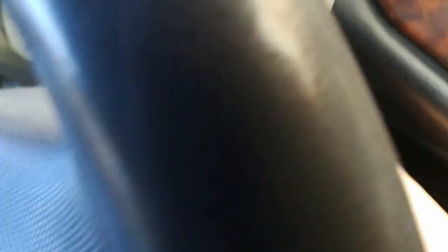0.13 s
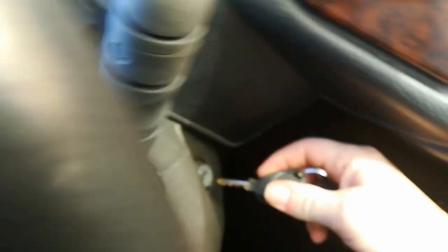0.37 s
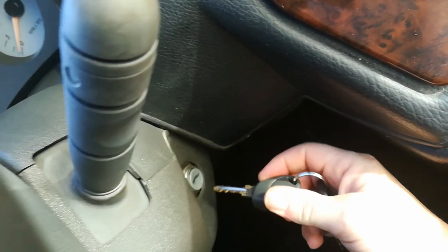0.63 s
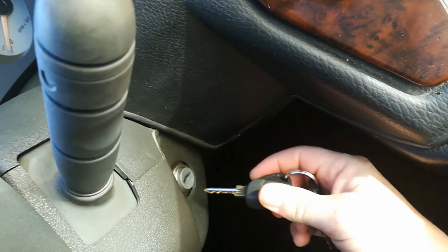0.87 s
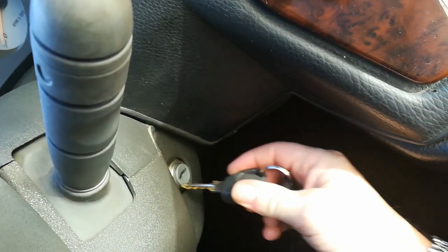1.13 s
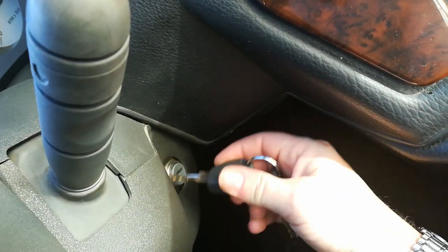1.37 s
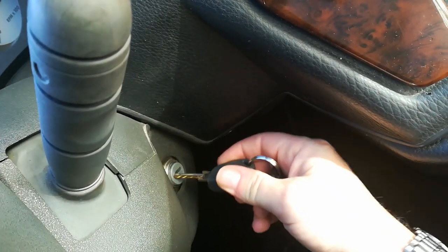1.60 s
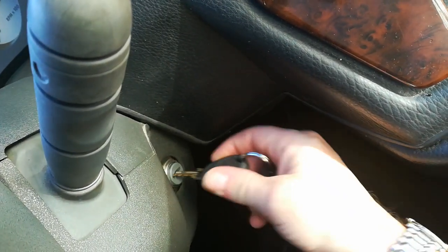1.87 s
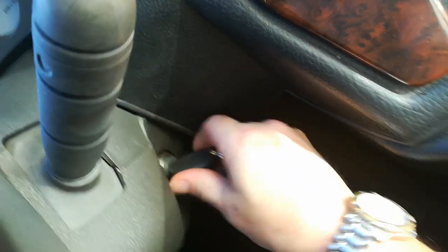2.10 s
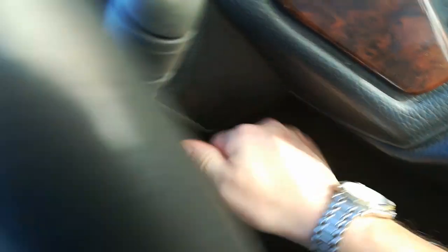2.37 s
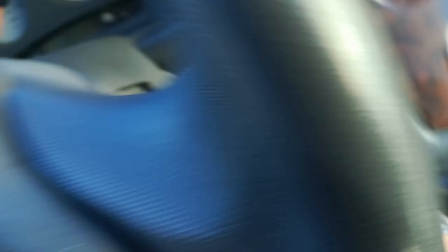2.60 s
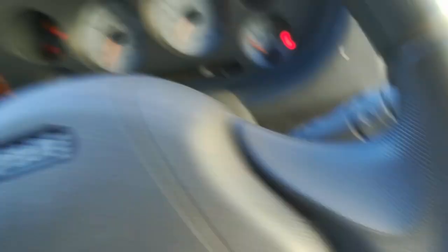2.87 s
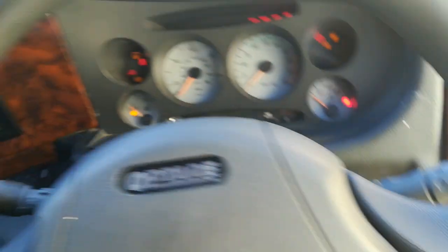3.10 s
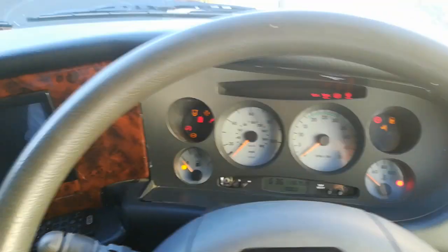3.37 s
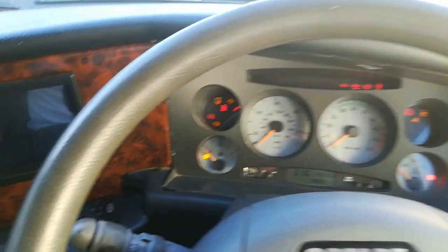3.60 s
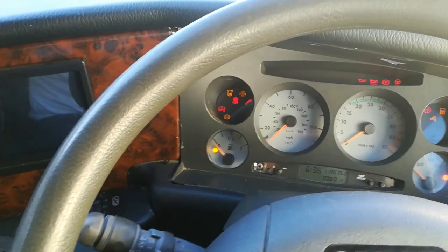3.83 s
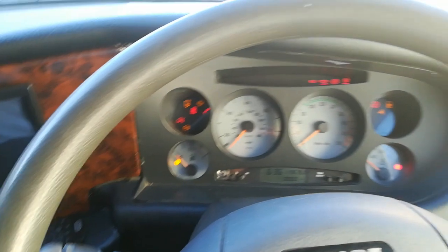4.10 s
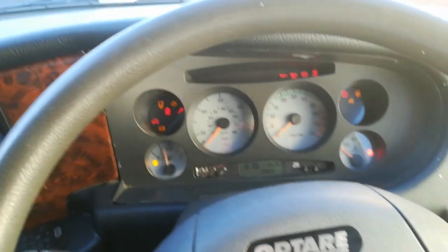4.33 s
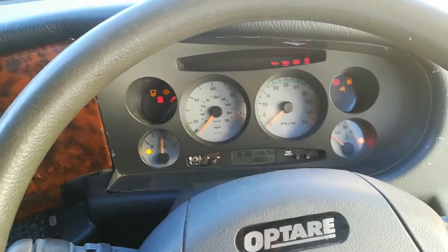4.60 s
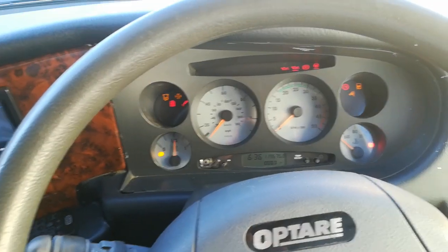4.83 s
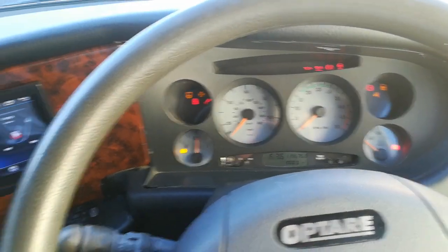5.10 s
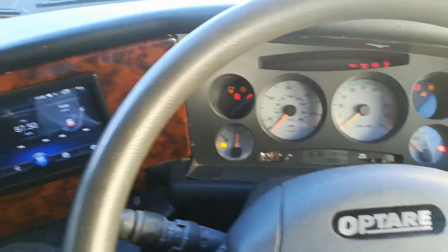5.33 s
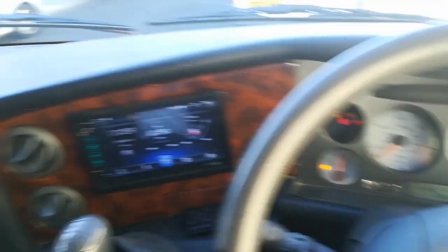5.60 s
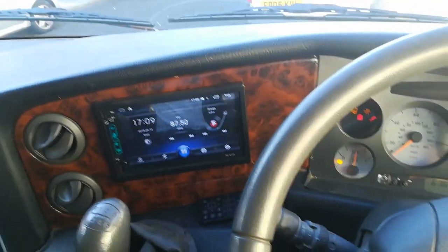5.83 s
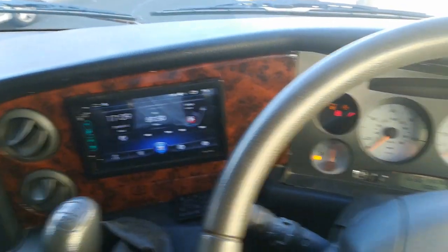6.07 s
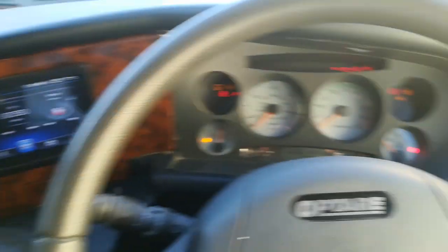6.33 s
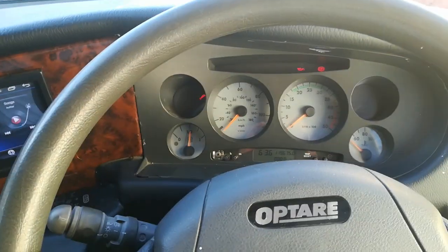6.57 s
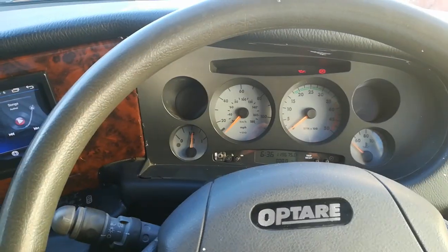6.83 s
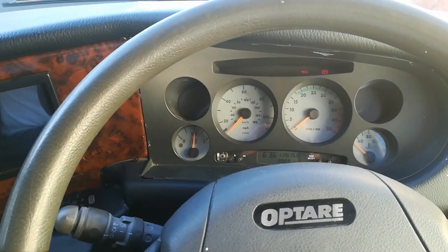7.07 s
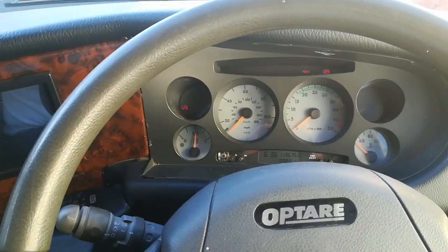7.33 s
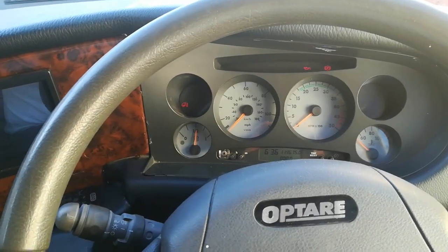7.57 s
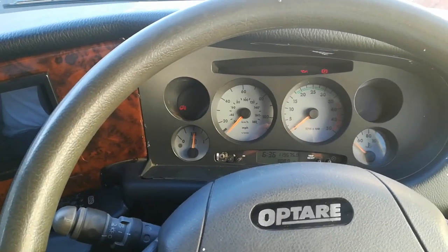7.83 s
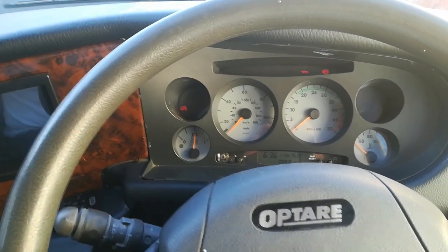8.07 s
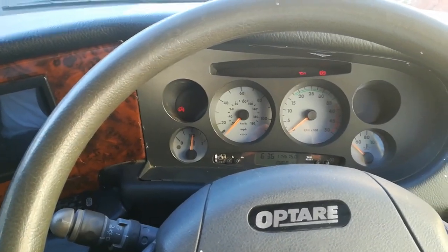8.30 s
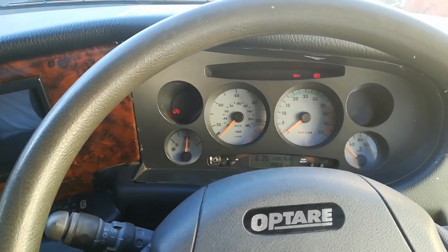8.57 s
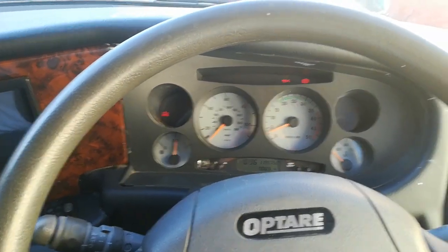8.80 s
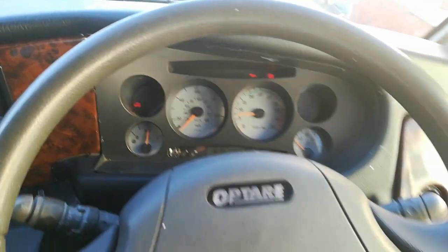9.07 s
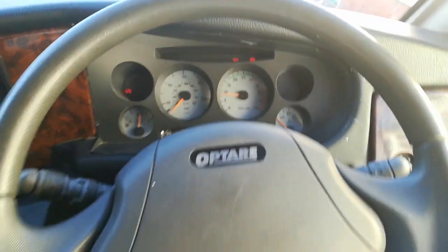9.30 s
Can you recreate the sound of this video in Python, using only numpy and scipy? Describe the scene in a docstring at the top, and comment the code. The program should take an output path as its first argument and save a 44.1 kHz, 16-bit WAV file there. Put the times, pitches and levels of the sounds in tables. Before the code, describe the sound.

Inside a small vehicle cab, key rattling and handling thumps give way to sharp relay clicks, laboured cranking, rough first firings and a steady diesel idle.

```python
"""A diesel engine is started, heard inside its small, short-ringing cab: summed crank orders make the exhaust and
double blows of noise the knock, from the first uneven firings to a four-cylinder idle. Before it the starter
clashes and whines as each compression frees it. A key taps the lock, slides in, turns and springs back and relays
click: noise rattles that excite damped modes. A sleeve brushes the wheel as stick-slip grains; soft knocks and a
creak are low damped modes. A hand-held phone adds grip rumble and hiss; the dashboard hums faintly."""
import sys
import numpy as np
from scipy import signal
from scipy.fft import rfft, irfft, next_fast_len
from scipy.io import wavfile
from scipy.ndimage import uniform_filter1d, map_coordinates

SR = 44100
rng = np.random.default_rng(int(sys.argv[2]) if len(sys.argv) > 2 else 0)


def ratio(d):
    """dB to gain"""
    e = np.asarray(d, float) / 20
    return 10 ** e


def wav_out(sig):
    """Save sig, one row per channel (or a flat mono array), as 16-bit PCM at SR to the path in sys.argv[1]."""
    wavfile.write(sys.argv[1], SR, np.round(np.clip(np.atleast_2d(sig).T, -1, 1) * 32767).astype(np.int16))


N = 415863
T = np.arange(N) / SR
SIZE = next_fast_len(N + SR // 2)
HZ = np.arange(SIZE // 2 + 1) * SR / SIZE

# Levels in all tables are relative: they hold at the source, ahead of later gains and the cab.

# microphone hiss spectrum: pitch_hz, density_db (per Hz)
HISS_SPECTRUM = [(59, -36), (100, -4.5), (302, -12), (365, -10), (705, -16.5), (1080, -13.5),
                 (16000, -23.5)]
HISS_DB = -73
# dashboard electrics: pitch_hz, level_db (rms)
ELECTRIC_HUM = [(360.7, -87), (726.7, -94)]
# stereo width of the cab's echo: pitch_hz, side_minus_mid_db
ECHO_WIDTH = [(60, -33), (125, -16), (250, -1.5), (500, 7)]
# balance of the two ports: pitch_hz, left_minus_right_db
PORT_BALANCE = [(200, 0.0), (1290, 2.0), (3000, 5.5), (8120, 3.5), (15000, -3.5)]

# the phone shifting in the hand: peak_s, level_db, rise_s, fall_s
HAND_SHIFTS = [(.3, -60, 0.31, 0.18), (2.1, -50, 0.24, 0.14), (3.001, -49, 0.46, 0.22),
               (4.05, -49.5, 0.086, 0.29), (4.45, -60, 0.33, .12), (5.65, -48, 0.11, 0.088)]
GRIP_DB = -66.5  # rumble of a still hand

# knocks through seat, wheel and chassis: start_s, level_db, pitch_hz, t60_s
BODY_KNOCKS = [(1.8, -49.5, 227, 0.2), (1.954, -30, 137, 0.13), (2.188, -30, 128, 0.27),
               (2.441, -29.5, 245, 0.066), (2.51, -26.5, 155, 0.018), (2.687, -30, 81, 0.019),
               (2.76, -37.5, 466, 0.1), (3.021, -41.5, 117, 0.58), (3.958, -45, 239, 0.25),
               (4.176, -26, 103, 0.11), (4.861, -39.5, 190, 0.13), (5.501, -46, 248, 0.23),
               (6.885, -25, 160, 0.21), (7.144, -23, 103, 0.092)]
# the wheel rim creaks: start_s, level_db, pitch_hz, t60_s, pitch_loss (share)
RIM_CREAK = (2.328, -33, 360, .1, .48)

# resonances of the rubbed surface: pitch_hz, width_hz, level_db
RUB_RESONANCES = [(7120, 500, 3), (1010, 210, 6), (1440, 310, -1), (2560, 250, 3), (3433, 1400, 2)]
# treble bands of rubbing that swell on their own: from_hz, to_hz, level_db
RUB_TREBLE = [(2500, 1500, -4.5), (3436, 5900, -4.5), (6300, 5200, 2), (9020, 11000, -12.5)]
RUB_DRIFT_MS = 2  # delay per unit of the smoothed wander
# one long drag of the sleeve along the wheel: time_s, level_db, brightness_db, bass_db
SLEEVE_DRAG = [(2.325, -53.5, 3, 12), (2.39, -50, -5, 4.5), (2.46, -45, 1, -0.5), (2.53, -43.5, -4.5, -6.5),
               (2.68, -56.5, 6.5, 0.5), (2.76, -50.5, -1, 1), (3.04, -50.5, -3, -4.5), (3.21, -52, -4, -3),
               (3.26, -67.5, -3.5, -3), (3.38, -76, -2.5, 8)]
# short brushes of key and cloth: start_s, rise_s, level_db, brightness_db, ring_hz, ring_db
SHORT_BRUSHES = [(0.01, 0.022, -52, -17.5, 6300, 0.5), (1.17, 0.061, -58.5, -16, 1870, -2),
                 (1.25, 0.035, -49.5, -8.5, 1920, -2.5), (1.771, 0.04, -56.5, -26.5, 1300, 4),
                 (1.871, 0.14, -46, -5.5, 1860, -1), (2.031, .11, -70, 8.5, 3030, -4),
                 (2.35, 0.11, -61.5, -19, 8300, 18), (2.48, 0.14, -67, -10, 2500, 15.5),
                 (2.85, 0.17, -67, -12, 7040, 10), (3.27, 0.019, -62.5, -14, 2500, -5.5),
                 (3.498, 0.066, -59, -14, 1594, 1), (3.947, 0.038, -50, -9.5, 5240, -11.5),
                 (4.151, 0.08, -56.5, -9.5, 9260, -8.5), (4.318, 0.0091, -75, 8, 3730, 9),
                 (4.44, 0.01, -73, 12.5, 3280, 3), (5.489, 0.024, -60, -2, 5506, -3)]
BRUSH_START_DB, BRUSH_FADE_DB_PER_S, BRUSH_RING_Q = -7.5, 412, 8

# dry ticks of loose trim close to the phone: start_s, level_db, brightness_db (per octave), rattle_ms
TRIM_TICKS = [(7.996, -26.5, -1, 0.82), (8.076, -23.5, 1.5, 1.8), (8.19, -30.5, 1.5, 2),
              (9.162, -34.5, -1.5, 0.74), (9.227, -20, 2, 0.69)]
# mode of the trim: pitch_hz, level_db, t60_s
TRIM_MODES = [(9434, 8, 0.0048)]
# relays under the dash: start_s, level_db, brightness_db (per octave), rattle_ms, hardest_struck_hz
RELAY_CLICKS = [(3.517, -39, -5, 1, 1659), (3.549, -44, -6, 2.05, 1659), (4.849, -7.5, -2, 2.2, 1659),
                (7.237, -22, -2, 1.35, 5800)]
# modes of a relay: pitch_hz, level_db, t60_s
RELAY_MODES = [(445, 0, 0.045), (1190, 4.5, 0.036), (1659, 8, 0.028), (3670, 1, 0.05), (5800, 5, 0.02)]
# the key tapping, entering and ratcheting over the pins:
# start_s, level_db, brightness_db (per octave), rattle_ms, hardest_struck_hz
LOCK_TAPS = [(0.087, -20.5, -5, 1.0, 1910), (1.126, -26.5, -3, 1.45, 1220),
             (1.158, -16.5, -1.5, 0.65, 1910), (1.284, -31.5, -5, 3, 1180), (1.539, -21.5, 0, 1.1, 3670),
             (1.597, -35, -12.5, 1.24, 1910), (1.808, -40, -12.5, 3.7, 1370),
             (1.903, -23, -0.5, 1.05, 1223), (1.924, -11.5, -0.5, 0.55, 1910),
             (1.937, -13.5, -3, 1.05, 1370), (1.95, -13.5, 2.5, 1.6, 1387), (1.963, -19, -0.5, 1.3, 4610),
             (1.986, -17.5, -1, 1.6, 1910), (2.0, -24.5, -3.5, 0.8, 4610), (2.007, -18.5, 0.5, 1.7, 1910),
             (2.178, -27, -3.5, 2.8, 1910), (2.194, -15, 0, 4, 4610), (2.269, -29.5, -3.5, 1.9, 5900),
             (2.281, -13.5, 1.5, 3.1, 4610), (2.414, -29.5, 0, 1.1, 3670), (2.757, -33, -2, 2.9, 1194),
             (3.155, -37.5, -2, 0.47, 5900)]
# modes of key and lock: pitch_hz, level_db, t60_s
LOCK_MODES = [(1194, 6, 0.024), (1382, 7, 0.024), (1910, 6, 0.018), (2635, 0, 0.018), (3670, -3.5, 0.022),
              (4610, -1, 0.03), (5900, -6, 0.029), (8000, -5, 0.025)]
# the ignition switch snapping through its detents: start_s, level_db, brightness_db (per octave), rattle_ms
SWITCH_SNAPS = [(6.734, -36.5, -5, 2.47), (6.758, -29.5, -0.5, 0.86), (6.781, -13.5, 1.5, 2),
                (8.259, -6, -1, 2.4), (8.297, -25.5, -6.5, 2.8)]
# modes of the ignition switch: pitch_hz, level_db, t60_s
SWITCH_MODES = [(900, 2, 0.025), (1657, 6, 0.025), (1860, 5, 0.025), (4600, -2, 0.015), (5170, 1, .015),
                (7290, 5, .012)]
# broad crack of a click: pitch_hz, level_db
CLICK_CRACK = [(150, -33.5), (650, -24.5), (900, 1), (2000, -0.5), (4000, 2.5), (10000, -1), (16000, -13)]
TRAVEL_S, TRAVEL_DB = 0.0065, -4  # a sprung part scrapes briefly before it snaps
MODE_SCATTER_DB, STRUCK_MODE_DB = 1, 9

# each piston going over compression frees the starter: start_s, gear_db, whine_db, free_run_s
FREE_RUNS = [(6.85, -38.5, -55, 0.04), (6.942, -48.5, -48.5, 0.086), (7.089, -44, -46, 0.17),
             (7.376, -41, -35.5, 0.07), (7.553, -40, -37, 0.074), (7.737, -38.5, -36.5, 0.073),
             (7.863, -37.5, -34, 0.38)]
# gear noise spectrum: pitch_hz, density_db (per Hz)
GEAR_SPECTRUM = [(500, -14.5), (839, -1.5), (1550, -7.5), (2070, -10), (7470, -13.5), (8300, -18.5),
                 (10800, -34.5)]
# the starter housing rings: pitch_hz, width_hz, level_db
HOUSING_RESONANCES = [(1870, 40, 11), (3150, 45, 7), (7200, 1100, 4)]
FREE_HZ, LOADED_HZ = 332, 199.8  # starter whine running free and pushing a piston up
COLD_S, FIRES_S, RELEASE_S = 7.05, 7.85, 8.2  # compression drags the starter down from COLD_S to FIRES_S
UNLOADED_DB = -11.5  # the whine is softer once the engine pulls itself round
POWERED_DB = -54  # steady gear noise under the free runs, as long as the motor is powered
COAST_DB, COAST_FADE_S = -50.5, 0.32
# the engine rocking on its mounts: a jolt at engagement, steady cranking, a swell as the cylinders catch
ENGAGE_S, JOLT_DB, JOLT_FADE_S, ROCK_DB = 6.875, -24.5, 0.019, -40.5
SWELL_FULL_S, SWELL_DB, SWELL_RISE_S = 8.03, -24.5, 0.06

# first uneven firings: start_s, knock_db, boom_db
FIRST_FIRINGS = [(7.862, -19.5, -36), (7.904, -28.5, -36), (7.936, -30.5, -43), (7.965, -20.5, -43),
                 (8.011, -19, -17), (8.045, -18, -22), (8.075, -16.5, -12), (8.117, -24.5, -14),
                 (8.226, -17.5, -21)]
# running engine: time_s, firing_rate_hz, exhaust_db, knock_db
IDLE_COURSE = [(8.16, 32, -34, -46), (8.27, 29.5, -27, -44), (8.34, 30, -21, -44), (8.46, 31.8, -25.5, -45),
               (9.1, 31.6, -27, -47), (9.43, 31.6, -28, -46)]
# exhaust orders: crank_multiple (times crank speed), level_db
CRANK_ORDERS = [(1, -20), (2, 0), (4, -2), (6, -14), (9, -14), (10, -12), (14, -18)]
# knock spectrum of the block: pitch_hz, density_db (per Hz)
BLOCK_SPECTRUM = [(140, -36), (230, -2), (360, -2), (645, -18.5), (1030, -17), (1810, -21.5), (2400, -21),
                  (3600, -23), (14000, -39)]
# panel resonances: pitch_hz, width_hz, level_db
PANEL_RESONANCES = [(1030, 70, 1), (1860, 240, 8.5), (2460, 110, 0)]
# knock strength of each cylinder in firing order: level_db
CYLINDER_KNOCK_DB = [-1, -1.5, -0.5, 2.5]
HALF_ORDER_DB = -20  # lines between the orders, from cycle-long unevenness
DIP_S = 8.71  # one moment of lowest exhaust pressure
KNOCK_S, SECOND_KNOCK_S, SECOND_KNOCK_DB = 0.0049, 0.013, -8  # each firing is two blows on the block
WHIRR_DB = -60  # steady hiss of belts and fan


def on_log(points):
    """Spectral interpolation: a (Hz, value) table read at every bin along a logarithmic axis."""
    hz, value = np.transpose(points)
    return np.interp(np.log(HZ + 1), np.log(hz), value)


def shape(x, gain):
    """Linear filtering: the spectrum is multiplied by a gain per bin."""
    return irfft(rfft(x, SIZE) * gain, SIZE)[..., :N]


def band(lo_hz, hi_hz):
    """Band-pass response: steep skirts outside two corner frequencies."""
    return 1 / np.sqrt((1 + (lo_hz / (HZ + 1)) ** 8) * (1 + (HZ / hi_hz) ** 8))


def peaks(table, base_db):
    """Resonance curves: Lorentzian powers of (Hz, width Hz, dB) standing on a flat base."""
    power = sum(ratio(db) ** 2 / (1 + (2 * (HZ - f) / w) ** 2) for f, w, db in table)
    return np.sqrt(ratio(base_db) ** 2 + power)


def unit(x):
    """Normalisation: scale to rms 1."""
    return x / np.sqrt(np.mean(x ** 2))


def noise(gain):
    """Coloured noise: white noise through a spectral gain, at rms 1."""
    return unit(shape(rng.standard_normal(N), gain))


def grains(spread_db):
    """Impulsive noise: samples of long-tailed size make a fine crackle."""
    return rng.standard_normal(N) * ratio(spread_db * np.minimum(rng.exponential(size=N), 6))


def walk(rate_hz):
    """Slow modulation: smoothed random steps of rms 1."""
    k = int(SR / rate_hz)
    return unit(uniform_filter1d(np.repeat(rng.standard_normal(N // k + 1), k), k)[:N])


def curves(table, fade_s=0.0062):
    """Parameter curves: columns per sample, and a gate open only while the table lasts."""
    s, *columns = np.transpose(table)
    gate = np.interp(T, [s[0] - fade_s, s[0], s[-1], s[-1] + fade_s], [0, 1, 1, 0])
    return [gate] + [np.interp(T, s, c) for c in columns]


def add(track, s, sound):
    """Superposition: mix a short sound in at s."""
    i = int(s * SR)
    track[i:i + len(sound)] += sound[:N - i]


def ring(hz, t60, rise_s, sag=0., sag_s=None):
    """Damped mode: a decaying sine after a soft push, peak 1; its pitch may sag as the contact loosens."""
    t = T[:SR // 2]
    turn = 2 * np.pi * hz * np.cumsum(1 - sag * np.tanh(t / (sag_s or t60))) / SR
    y = np.sin(turn) * 1000. ** (-t / max(t60, .005)) * (1 - np.exp(-t / rise_s))
    return y / np.abs(y).max()


def cab(x, t60=.14, direct_db=-4, gain_db=0):
    """Small-room acoustics: bass arrives nearly alike at both ports, treble by two unlike dense echo tails."""
    t = T[:SR // 4]
    tail = rng.standard_normal((2, len(t))) * 1000. ** (-t / t60)
    tail /= np.sqrt(np.sum(tail ** 2, axis=1, keepdims=True))
    tail[:, 0] += ratio(direct_db) * np.array([1, 0])  # direct sound, in the mid only
    mid, side = rfft(tail, SIZE) / np.sqrt(1 + ratio(direct_db) ** 2)
    high = 1 / (1 + (480 / (HZ + 1)) ** 4)
    mid = 1 - high + high * mid
    side = side * ratio(on_log(ECHO_WIDTH))
    lean = ratio(on_log(PORT_BALANCE) / 2)
    ports = np.array([(mid + side) * lean, (mid - side) / lean])
    return shape(x, ports * ratio(gain_db) / np.sqrt((lean ** 2 + lean ** -2) / 2))


def stillness():
    """Incoherent noise and pure tones: microphone hiss, unlike in each port, and faint electric hum."""
    hiss = np.array([noise(ratio(on_log(HISS_SPECTRUM))) for _ in range(2)]) * ratio(HISS_DB + 3)
    return hiss + sum(np.sqrt(2) * ratio(db) * np.sin(2 * np.pi * f * T) for f, db in ELECTRIC_HUM)


def hand():
    """Contact rumble: low noise from the grip on the phone, swelling at each shift."""
    level = ratio(GRIP_DB)
    for s, db, rise_s, fall_s in HAND_SHIFTS:
        level = level + ratio(db) * np.exp(-((T - s) / np.where(T < s, rise_s, fall_s)) ** 2)
    waver = ratio(2.5 * walk(5))
    return level * waver * noise(band(8.2, 67) + ratio(-18.5) * band(97, 210))


def thumps():
    """Modal excitation: soft blows ring a low mode and leave a rumble in the body shell; the rim creaks."""
    modes, shell = np.zeros((2, N))
    t = T[:SR]
    for s, db, hz, t60 in BODY_KNOCKS:
        add(modes, s, ratio(db) * ring(hz, t60, 0.0041, sag=0.11))
        add(shell, s, ratio(db - 13.5) * 1000. ** (-t / (3 * t60)) * np.tanh(t / 0.0028))
    s, db, hz, t60, sag = RIM_CREAK
    add(modes, s, ratio(db) * ring(hz, t60, 0.022, sag=sag, sag_s=0.029))
    rumble = noise(band(25, 380) * (60 / (HZ + 30)) ** 0.21)
    return shape(modes, band(10, 900)) + shell * rumble


def steady(x):
    """Level equalisation: divide by the running rms."""
    return x / np.sqrt(uniform_filter1d(x ** 2, SR // 8) + 1e-12)


def wander(x):
    """Doppler-like drift: a varying delay moves the resonance as the contact moves."""
    delay = RUB_DRIFT_MS * SR / 1000 * uniform_filter1d(walk(6), SR // 10)
    return map_coordinates(x, [np.arange(N) + delay], order=1, mode="mirror")


def friction():
    """Stick-slip: dense grains excite resonances that swell on their own; returns grains, low, mid and top."""
    rub = grains(1.6) * ratio(1.5 * walk(45))
    body = ratio(-14) * rub
    for f, w, db in RUB_RESONANCES:
        ringing = shape(rub, 1 / np.hypot(1, 2 * (HZ - f) / w))
        body = body + ratio(db + 4 * walk(9)) * wander(ringing)
    low = unit(shape(rub, band(100, 290) + ratio(-8.5) * band(420, 900)))
    mid = steady(shape(body, band(780, 2400) ** 2))
    top = 0
    for lo, hi, db in RUB_TREBLE:
        top = top + ratio(db + 0.85 * walk(2.2)) * shape(body, band(lo, hi))
    return rub, low, mid, steady(top)


def slides():
    """Sliding friction: one long sleeve drag, and short brushes that also squeak at a sharp resonance."""
    rub, low, mid, top = friction()
    gate, db, bright_db, bass_db = curves(SLEEVE_DRAG)
    out = gate * ratio(db) * (mid + ratio(bright_db) * top + ratio(bass_db) * low)
    for s, rise_s, db, bright_db, hz, ring_db in SHORT_BRUSHES:
        late = T[:SR // 2] - rise_s
        now = slice(int(s * SR), int(s * SR) + SR // 2)
        level_db = np.where(late < 0, -BRUSH_START_DB * late / rise_s, -BRUSH_FADE_DB_PER_S * late)
        peak = signal.iirpeak(hz, BRUSH_RING_Q, SR)
        squeak = unit(signal.lfilter(*peak, signal.lfilter(*peak, rub[now])))
        brush = mid[now] + ratio(bright_db) * top[now] + ratio(ring_db) * squeak
        add(out, s, ratio(db + level_db) * brush)
    return out


def strike(rows, modes, travel_db):
    """Impact excitation: a short rattle of metal rings the modes of the part and cracks in the treble."""
    lead_s = .02  # room ahead of the click for the travel scrape
    out, t = np.zeros(N), T[:8192] - lead_s
    hz = np.arange(4097) * SR / 8192 + 1
    crack_hz, crack_db = np.transpose(CLICK_CRACK)
    crack = ratio(np.interp(np.log(hz), np.log(crack_hz), crack_db))
    lowest = 0.59 * modes[0][0]  # the part is too small to radiate far below its first mode
    travel = ratio(travel_db) * (t > -TRAVEL_S) * np.exp(-np.abs(t) / TRAVEL_S)
    for (s, db, tilt_db, ms, *struck), chance in zip(rows, rng.standard_normal((len(rows), 8192))):
        u = np.maximum(t, 0) * 1000 / max(ms, .3)
        push = rfft(chance * (u * np.exp(1 - u) + travel))
        # every mode is set going, whatever the rattle's colour
        strength = np.abs(push) / np.sqrt(np.mean(np.abs(push) ** 2)) + .2
        body = crack
        for (f, mode_db, t60), scatter in zip(modes, chance[::-1]):
            favour_db = sum(STRUCK_MODE_DB * np.exp(-(10 * np.log(f / k)) ** 2) for k in struck)
            height = ratio(mode_db + MODE_SCATTER_DB * scatter + favour_db) / np.interp(f, hz, strength)
            body = body + height / (1 + 2j * np.pi * (hz - f) * t60 / np.log(1000))
        tilt = ratio(tilt_db * np.log2(np.maximum(hz, 900) / 1600))
        y = irfft(push * body * tilt / (1 + (lowest / hz) ** 2))
        add(out, s - lead_s, ratio(db) * y / np.abs(y).max())
    return out


def trim():
    """Impact on a light part: each dry tick rings one very short mode."""
    return strike(TRIM_TICKS, TRIM_MODES, -31)


def clicks():
    """Impacts of small metal parts: the key on the lock, and the sprung switch and relays."""
    key = strike(LOCK_TAPS, LOCK_MODES, -29.5)
    switch = strike(SWITCH_SNAPS, SWITCH_MODES, TRAVEL_DB)
    return key + switch + strike(RELAY_CLICKS, RELAY_MODES, TRAVEL_DB)


def starter_gear():
    """Gear meshing under varying load: teeth clash and whine in each free run, slowing into compression."""
    clash, whine, growl = np.zeros((3, N))
    for s, gear_db, whine_db, run_s in FREE_RUNS:
        t = T[:int((run_s + .1) * SR)]
        free = (1 - np.exp(-t / 0.002)) * np.exp(-np.maximum(t - run_s, 0) / 0.021)
        slowing = (COLD_S < s < FIRES_S) * np.minimum(t / run_s, 1)
        turn = 2 * np.pi * np.cumsum(FREE_HZ + (LOADED_HZ - FREE_HZ) * slowing) / SR
        add(clash, s, ratio(gear_db) * free * (1 + 0.44 * np.exp(-t / 0.011)))
        add(growl, s, ratio(whine_db) * free)
        tone_level = ratio(whine_db + 3.0 + UNLOADED_DB * (s > FIRES_S))
        add(whine, s, tone_level * free * np.minimum(t / run_s + 0.1, 1) * np.sin(turn))
    gear = unit(shape(grains(2.9), ratio(on_log(GEAR_SPECTRUM)) * peaks(HOUSING_RESONANCES, 0)))
    # the motor draws current from key to release
    powered = np.interp(T, [6.78, 6.83, 8.25, 8.3], [0, 1, 1, 0])
    teeth = shape(clash * gear, 1 / np.hypot(1, HZ / 1500))
    teeth = teeth + shape(powered * ratio(POWERED_DB) * gear, band(990, 12000))
    low_growl = (growl + ratio(-49.0) * powered) * ratio(-6.0) * noise(band(99, 460))
    return teeth + low_growl + whine * ratio(2.0 * walk(27))


def mounts():
    """Structure-borne vibration: the engine rocks on its mounts and the floor panel rings under the motor."""
    rock = ratio(ROCK_DB) + ratio(JOLT_DB) * np.exp(-np.abs(T - ENGAGE_S) / JOLT_FADE_S)
    swell = ratio(SWELL_DB) * np.exp(np.minimum(T - SWELL_FULL_S, 0) / SWELL_RISE_S)
    gate = np.clip(np.minimum(T - ENGAGE_S, RELEASE_S - T) / 0.0051 + 1, 0, 1)
    floor_panel = ratio(-43.0) * gate * noise(peaks([(153.3, 19.0, 0.016)], -63.0))
    return floor_panel + gate * (rock + swell) * noise(band(10, 81)) * ratio(2.9 * walk(31))


def pinion():
    """Overrunning: the pinion hisses once the engine fires, and coasts down after release."""
    level = np.clip((T - FIRES_S) / 0.2, 0, 1) * np.exp(-np.maximum(T - RELEASE_S, 0) / COAST_FADE_S)
    return ratio(COAST_DB) * level * noise(band(4500, 9000) + ratio(-15) * band(9000, 15000))


def knock(s):
    """Impulsive forcing: envelope of the two blows, s after the first."""
    blow = lambda u: np.maximum(u, 0) / KNOCK_S * np.exp(1 - np.abs(u) / KNOCK_S)
    return blow(s) + ratio(SECOND_KNOCK_DB) * blow(s - SECOND_KNOCK_S)


def exhaust_orders(firing):
    """Harmonic synthesis: sines at multiples of crank speed, which is half the firing rate."""
    lines = CRANK_ORDERS + [(k - .5, HALF_ORDER_DB) for k, db in CRANK_ORDERS]
    exhaust = 0
    for (k, db), chance in zip(lines, rng.random(len(lines))):
        # firing orders line up into one pressure dip, lagging above the cab boom;
        # the rest come from unequal cylinders
        lag = chance if k % 2 else (k > 4) / 3
        exhaust = exhaust - ratio(db + 0.88 * walk(5.8)) * np.cos(np.pi * k * firing - 2 * np.pi * lag)
    return unit(exhaust)


def idle_push(firing, hz):
    """Periodic forcing: two blows per firing, unequal by cylinder and by chance, at rms 1."""
    # combustion starts between two dips
    count, part = np.divmod(firing - .42, 1)
    count = count.astype(int)
    size_db = np.array(CYLINDER_KNOCK_DB)[count % 4] + 1.2 * rng.standard_normal(N // 256)[count]
    return unit(ratio(size_db) * knock(part / hz) + 0.22)


def clatter(force, colour, level_band):
    """Forced vibration of the block: crackle under the blows, coloured and levelled by its filter's gain."""
    level = np.sqrt(np.mean((colour * level_band) ** 2))
    return shape(force * unit(grains(0.7)), colour / level)


def engine():
    """Combustion noise: clean exhaust orders, a knock of the block at each firing, rough first firings."""
    gate, hz, exhaust_db, knock_db = curves(IDLE_COURSE, fade_s=0.017)
    firing = np.cumsum(hz) / SR
    firing = firing - firing[int(DIP_S * SR)]
    exhaust = gate * ratio(exhaust_db) * exhaust_orders(firing)
    push = gate * ratio(knock_db) * idle_push(firing, hz)
    bang, boom = np.zeros((2, N))
    for s, db, boom_db in FIRST_FIRINGS:
        add(bang, s, ratio(db - 15.0) * knock(T[:4096]))
        add(boom, s, ratio(boom_db) * (ring(38, 0.085, 0.012) + ratio(-6) * ring(86, 0.045, .004)))
    colour = ratio(on_log(BLOCK_SPECTRUM)) * peaks(PANEL_RESONANCES, 0.13)
    # cold, late ignition is harsher: less body, more ring near the top of the bore
    harsh = colour * (HZ / 1000) ** 1.1 * peaks([(2710, 170, 2.1)], -7.5) * band(240, 7400)
    level_band = band(480, 6900)
    blows = clatter(push, colour * band(227, 4400), level_band) + clatter(bang, harsh, level_band)
    whirr = gate * ratio(WHIRR_DB) * noise(band(2500, 6500) + ratio(-21.5) * band(8700, 13000))
    return exhaust + boom + ratio(0.5) * blows + whirr


def scene():
    """Superposition of three places in the cab: the column, the driver, the engine bay."""
    driver = cab(slides() + thumps() + hand() + trim(), t60=0.05, direct_db=7.0)
    column = cab(clicks(), t60=0.097, direct_db=5.5, gain_db=2.5)
    bay = cab(starter_gear() + mounts() + pinion() + engine(), t60=0.056, direct_db=5.5)
    # hiss and hum are set lower while the engine bay is loud
    loud = np.sqrt(uniform_filter1d(bay[0] ** 2, SR // 10) + 1e-18)
    return column + driver + bay + stillness() / (1 + loud / ratio(-50))


def top_cut(x):
    """Nothing passes above the cut-off."""
    return signal.sosfilt(signal.butter(12, 16630, fs=SR, output="sos"), x)


def record(dry):
    """Saturation: the phone rounds the loudest peaks."""
    rounded = np.tanh(dry)
    return top_cut(rounded)


dry = scene()
out = record(dry)
wav_out(out)
```